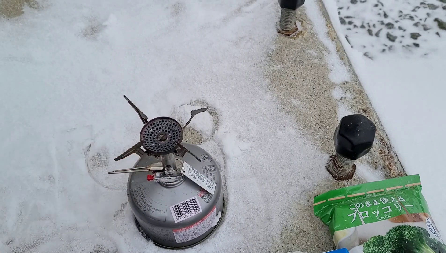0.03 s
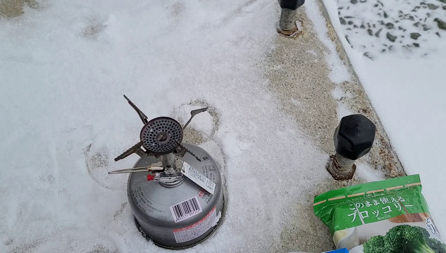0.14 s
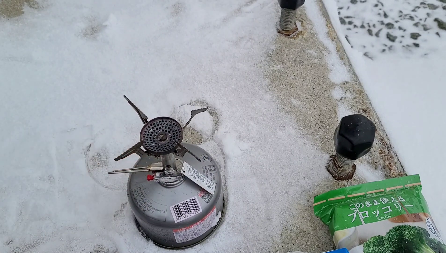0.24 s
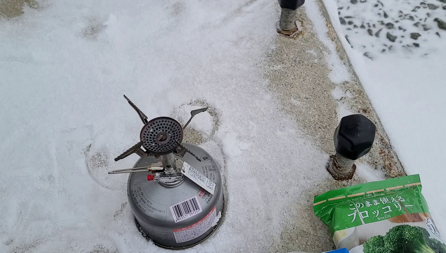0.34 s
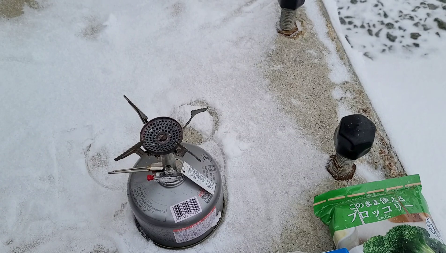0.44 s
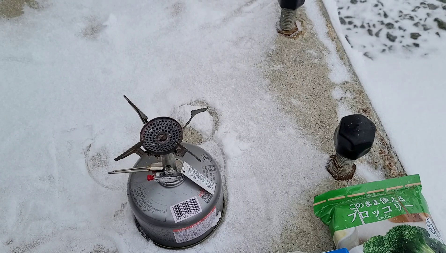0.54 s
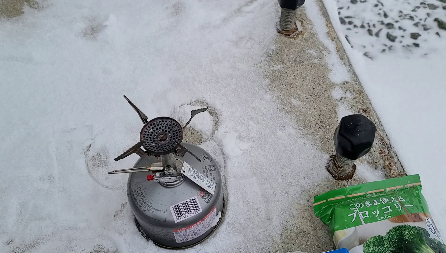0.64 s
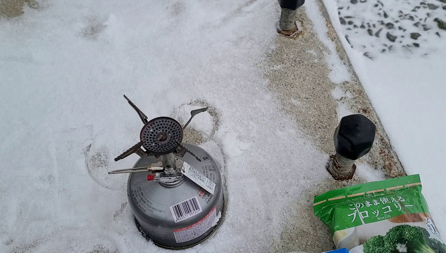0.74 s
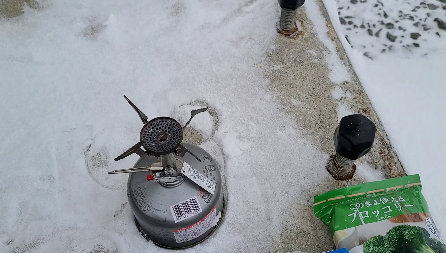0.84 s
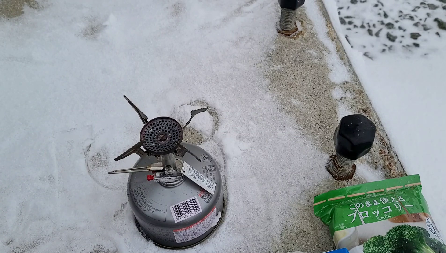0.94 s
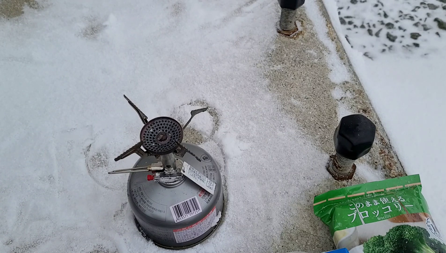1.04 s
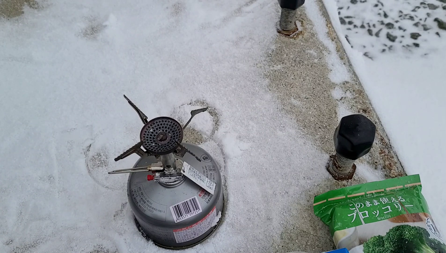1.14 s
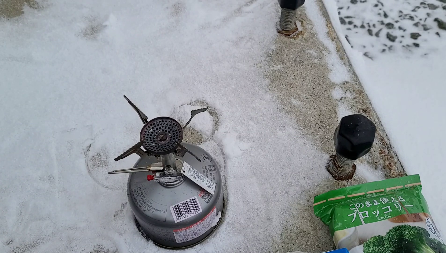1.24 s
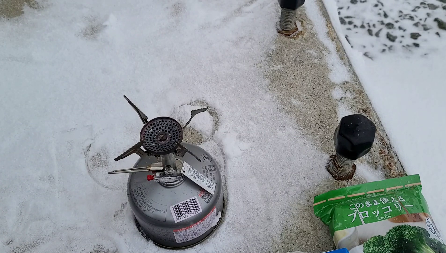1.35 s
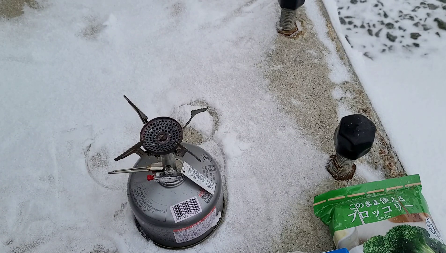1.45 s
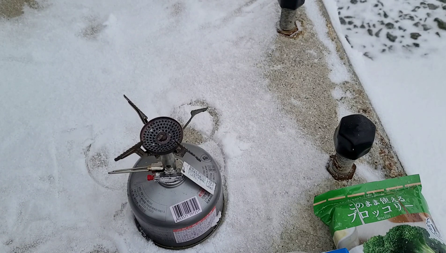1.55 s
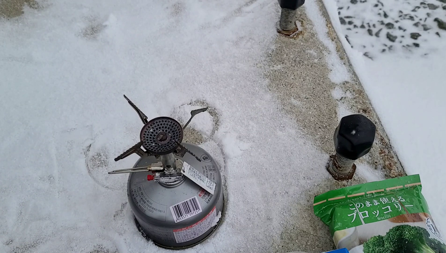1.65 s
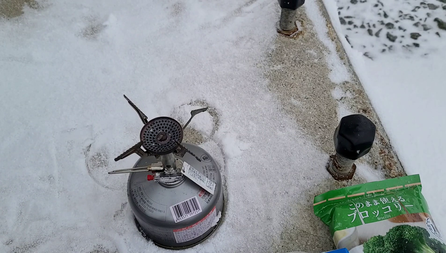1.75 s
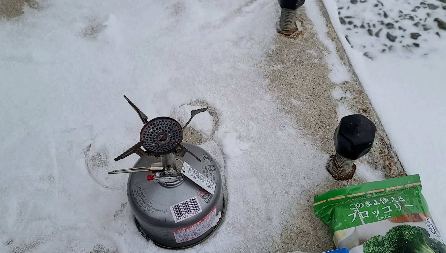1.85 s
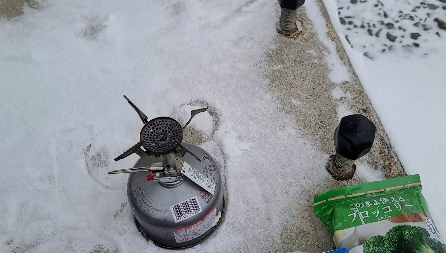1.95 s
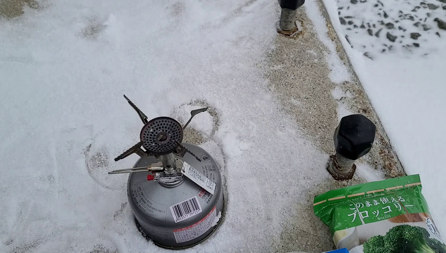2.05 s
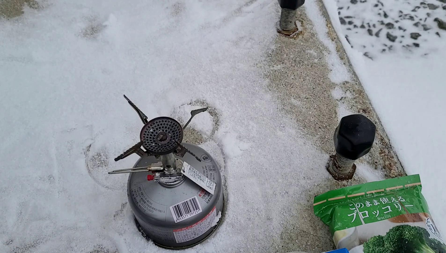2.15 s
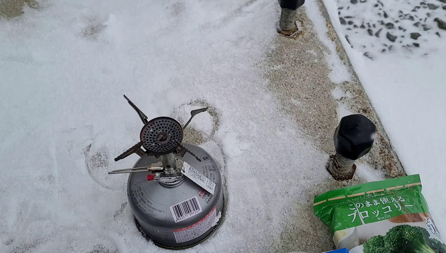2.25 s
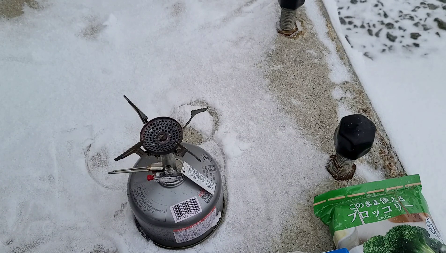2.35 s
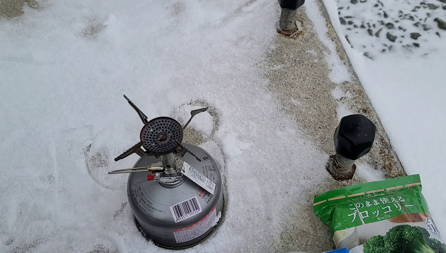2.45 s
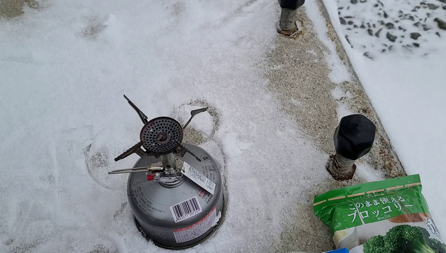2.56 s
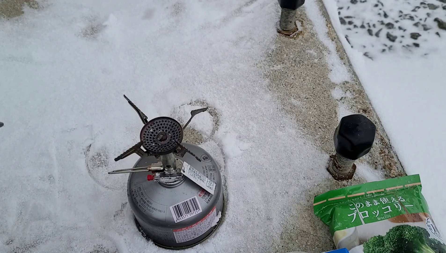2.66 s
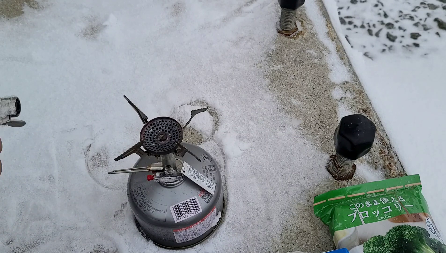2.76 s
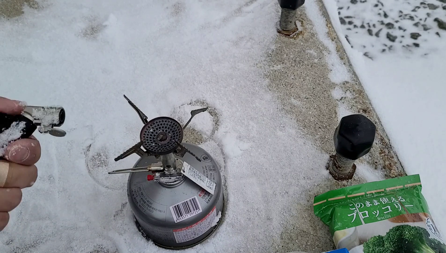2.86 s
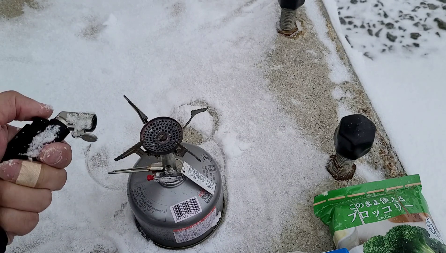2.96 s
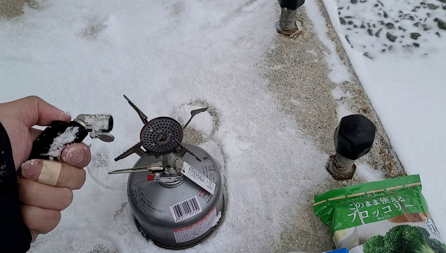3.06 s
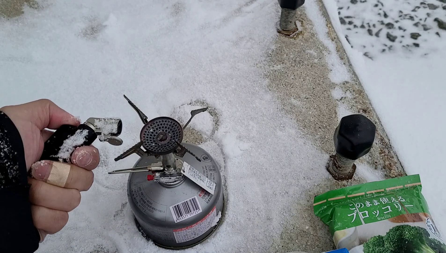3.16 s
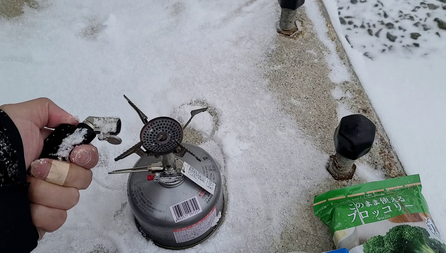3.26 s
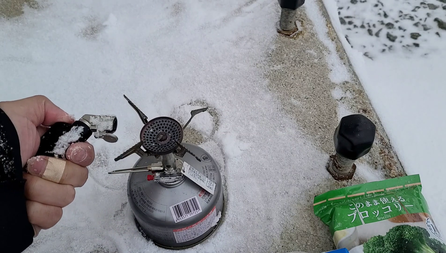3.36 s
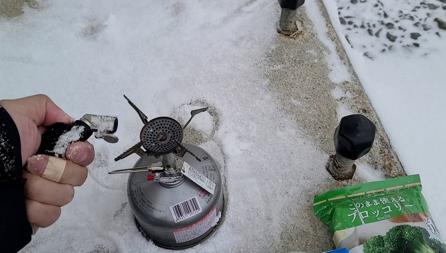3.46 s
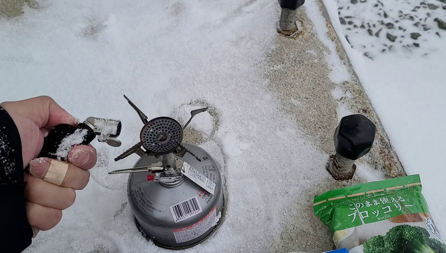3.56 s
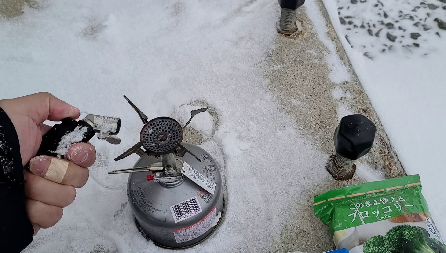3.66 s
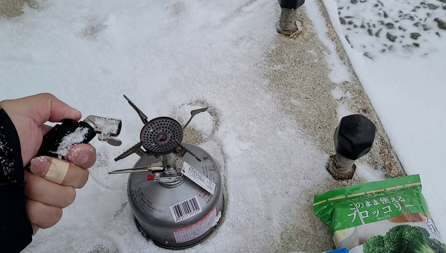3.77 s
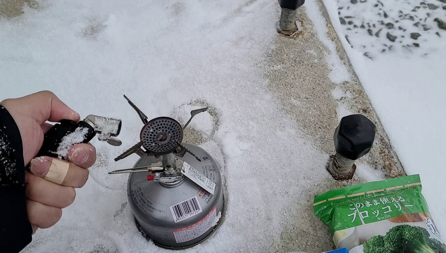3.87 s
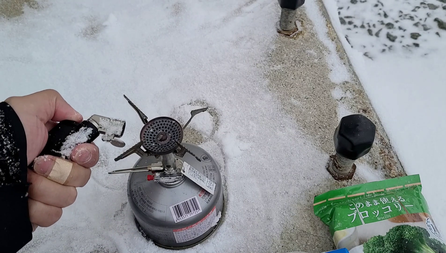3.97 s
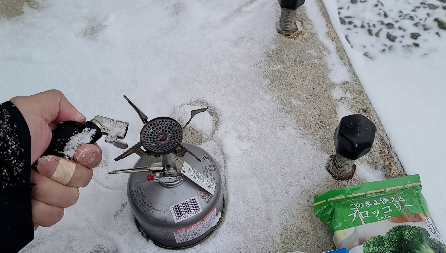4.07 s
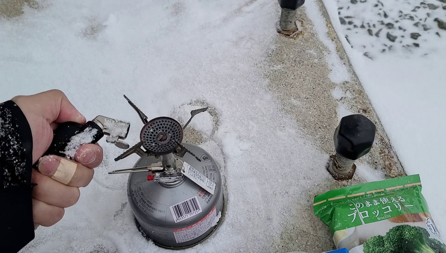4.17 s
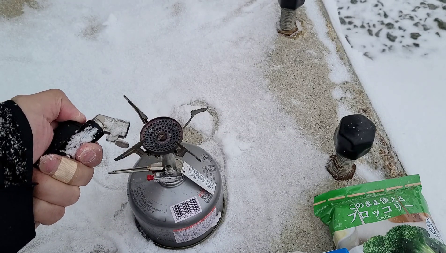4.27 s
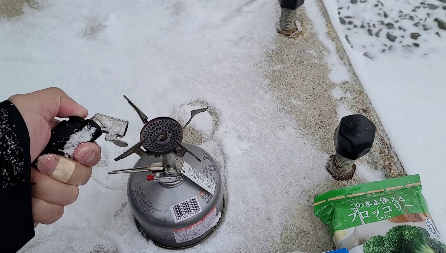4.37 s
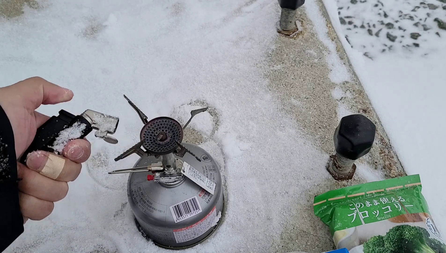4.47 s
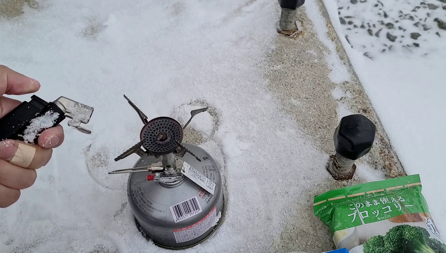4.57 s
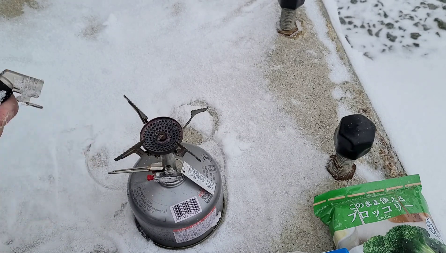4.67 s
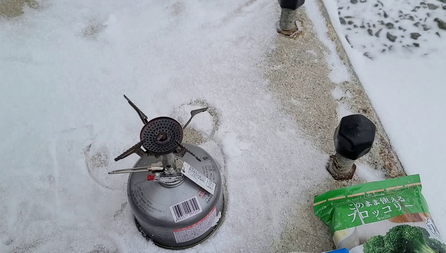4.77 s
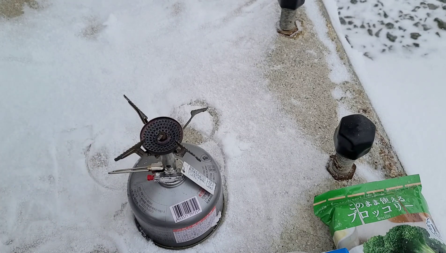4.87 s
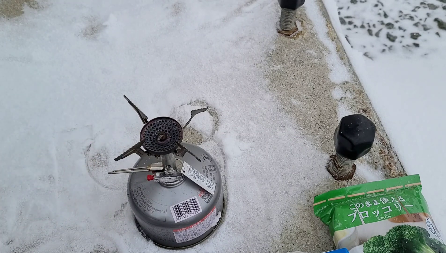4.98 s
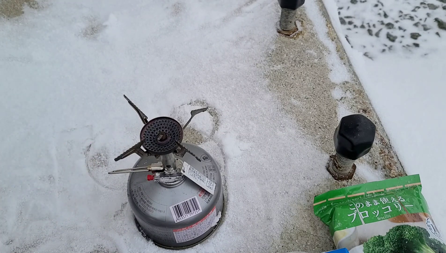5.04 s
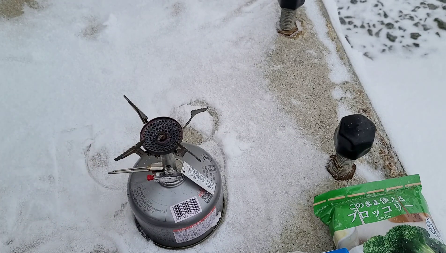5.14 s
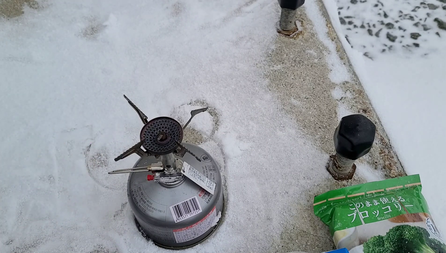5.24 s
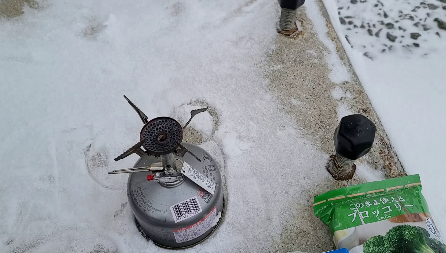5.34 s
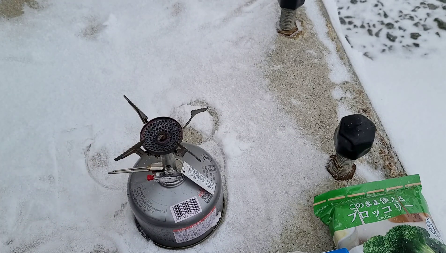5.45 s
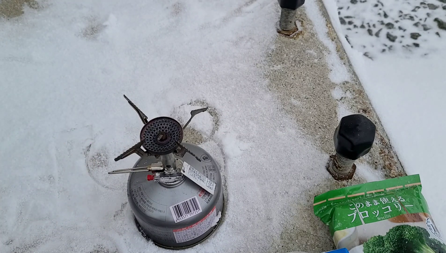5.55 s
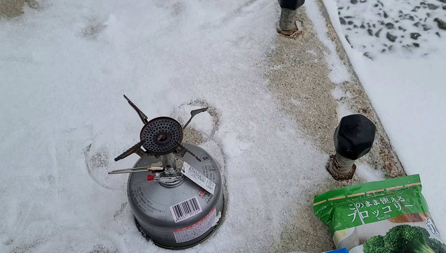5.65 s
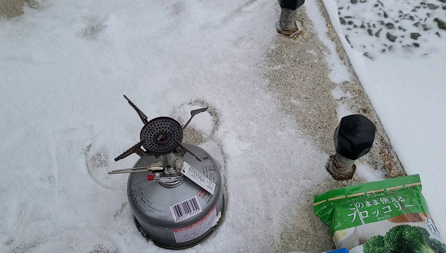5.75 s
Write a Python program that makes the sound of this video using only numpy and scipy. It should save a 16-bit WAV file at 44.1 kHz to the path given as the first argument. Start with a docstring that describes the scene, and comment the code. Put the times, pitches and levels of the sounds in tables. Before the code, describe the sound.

Outdoors on snow, very dry, with close stereo microphones. From the start a small camping stove jet gives a thin, bright hiss around 3 to 5 kHz, stronger on the left, over a very faint low outdoor rumble. In the first 0.4 s cloth rustles with sharp little crackles; then mostly hiss alone until about 1.8 s, when sleeve and hand crackles return through 2.9 s, mostly left, and the hiss softens. A few tiny ticks follow near 3.2 s. At 3.5 s a lighter snaps crisply, with small rattling rebounds and a faint release at 3.7 s. At 4.23 s it snaps again and the gas catches at once: a short, deep, loud thump. The hiss drops, and a low, puffing, fluttering flame roar with a soft rush above continues to the end at 5.8 s. Small release and handling ticks come at 4.45, 4.84 and 5.0 s, and a last lighter click at 5.3 s.

```python
"""Cold gas hisses from the jet of a small camping stove on snow, close to a pair of microphone ports, while
a hand and sleeve rustle and crackle on the left. A spring lighter snaps; at its second press the gas cloud
catches with a thump and the flame roars low, over a faint outdoor rumble. Hiss, flame, cloth and rumble are
shaped noise with wandering levels; the thump is a sagging swing; lighter and crackles are struck resonances."""
import sys
import numpy as np
from scipy import signal
from scipy.fft import rfft, irfft, next_fast_len
from scipy.io import wavfile
from scipy.ndimage import uniform_filter1d

SR = 44100
rng = np.random.default_rng(int(sys.argv[2]) if len(sys.argv) > 2 else 0)


def waveform_to_disk(signal):
    """Save audio, clipped to [-1, 1], as 16-bit WAV at the path in sys.argv[1]."""
    frames = np.transpose(np.atleast_2d(signal))
    scaled = np.clip(frames, -1, 1) * 32767
    samples = np.round(scaled).astype(np.int16)
    wavfile.write(sys.argv[1], SR, samples)


def voltage_ratio(level):
    """Linear amplitude factor for a level in decibels (scalar or array-like)."""
    return 10 ** (np.asarray(level, float) / 20)


N = 256220
TIME = np.arange(N) / SR
HZ = np.fft.rfftfreq(next_fast_len(N, True), 1 / SR) + 1  # 1 Hz up, clear of zero


def curve(rows):
    """Columns of a table of curves, one value a sample."""
    s, *columns = np.transpose(rows)
    return [np.interp(TIME, s, column) for column in columns]


def across(rows, hz):
    """Value of a (Hz, value) table on a log-frequency axis."""
    at, value = np.transpose(rows)
    return np.interp(np.log(hz), np.log(at), value)


def unit(x):
    """Scale to rms 1."""
    return x / np.sqrt(np.mean(x ** 2))


def walk(rate):
    """Random levels held 1 / rate s and slewed twice; spread 1."""
    k = int(SR / rate)
    steps = np.repeat(rng.standard_normal(3000)[:N // k + 1], k)
    return unit(uniform_filter1d(uniform_filter1d(steps, k), k)[:N])


def pair(gain, like, lag_s=0.):
    """Left and right noise of one colour; the shared part reaches the right port later."""
    real, imag = rng.standard_normal((2, 3, len(HZ)), dtype=np.float32)
    shared, left, right = real + 1j * imag
    like = np.clip(like, 0, 1)
    late = np.exp(-2j * np.pi * HZ * lag_s)
    common = np.sqrt(like) * shared * np.array([late ** 0, late])
    own = np.sqrt(1 - like) * np.array([left, right])
    return irfft(gain * (common + own))[:, :N]


def octaves(colour, like, count, low_hz):
    """Noise of a colour, cut into overlapping octave bands: (centre Hz, stereo band)."""
    gain = voltage_ratio(across(colour, HZ)) * (HZ < colour[-1][0])
    for hz in low_hz * 2. ** np.arange(count):
        window = np.cos(np.pi / 2 * np.clip(np.log2(HZ / hz), -1, 1))
        yield hz, pair(gain * window, across(like, HZ))


def add(out, s, sound, pan_db, late_s):
    """A short sound (one row, or a row for each port) laid in, the right port later."""
    rows = np.atleast_2d(sound)
    for side in range(2):
        i = int(s * SR) + side * round(late_s * SR)
        row = rows[-side]
        out[side, i:i + len(row)] += row[:N - i] * voltage_ratio(pan_db * (.5 - side))


def jet():
    """Turbulent gas rings the burner tube; every resonance flickers a little on its own."""
    # hiss level, dropping in steps, and muffled once the flame sits on it:
    # t/s, hiss level/dB, fizz above 5 kHz against the hiss/dB
    hiss_levels = [(0.0, -49, -2), (.47, -50.5, -4.5), (1.52, -49.5, -4), (2.02, -53.5, -3), (3.0, -55, -3),
                   (4.27, -56.5, -2), (4.33, -61.5, -1.5), (4.6, -60.5, -2.5), (5.0, -60, -4),
                   (5.81, -61.5, -3)]
    # resonances of the jet and burner tube:
    # f/Hz, width/Hz, relative level/dB, left minus right/dB, likeness of the ports/0-1
    burner = [(2300, 2300, -13.5, 0, 0.53), (3403, 700, -0.5, 3.5, 0.95), (4010, 680, 1, 7.5, 0.72),
              (4462, 504, 2.5, 7, 0.72), (5550, 290, -19, 4, 0.8), (6374, 600, -7.5, 5.5, 0.43),
              (7260, 740, -5.5, 4.5, 0), (8740, 2700, -15.5, -2, 0.05), (11630, 2140, -13.5, 9, 0.85),
              (14500, 1800, -14.5, 5.5, .4)]
    tube, fizz = 0, 0
    sway = walk(3.03)
    for hz, width, db, pan_db, like in burner:
        ring = 1 / (1 + ((HZ - hz) / (width / 2)) ** 2)  # a resonance passed twice: dark valleys
        sides_db = np.array([[pan_db], [-pan_db]]) / 2
        flicker_db = .5 * sway + 1.42 * walk(14.)
        band = voltage_ratio(db + flicker_db + sides_db) * pair(ring, like, lag_s=.00002)
        if hz < 5000:
            tube = tube + band
        else:
            fizz = fizz + band
    hiss_db, fizz_db = curve(hiss_levels)
    return (unit(tube) + unit(fizz) * voltage_ratio(fizz_db)) * voltage_ratio(hiss_db)


def flame():
    """Unsteady burning: a low roar puffs and flickers band by band, a rush above it flutters faster and wider."""
    # colour of the flame: f/Hz, relative level/dB per Hz
    roar_colour = [(24, -45), (40, -38), (65, -8.5), (100, 3.5), (150, -1.5), (190, 2.5), (437, -13),
                   (550, -24.5), (1100, -21), (1470, -38), (1850, -29), (3000, -50.5), (3550, -74),
                   (4470, -43.5), (6000, -45.5), (7800, -81), (13200, -120)]
    # f/Hz, likeness of the ports/0-1
    roar_like = [(100, 0.99), (300, 0.99), (640, 0.98), (1400, 0.76), (4000, 0.8)]
    # strength of the burning: t/s, low roar level/dB before the flare, rush level/dB
    burning_levels = [(4.3, -44, -45.5), (4.38, -43, -49), (4.44, -39, -42.5), (4.5, -42, -50),
                      (4.63, -45.5, -52), (4.72, -42.5, -52.5), (4.87, -39.5, -51), (4.95, -40.5, -54.5),
                      (5.06, -42.5, -50.5), (5.16, -38.5, -48), (5.26, -39.5, -53), (5.37, -42.5, -50.5),
                      (5.55, -39.5, -52), (5.7, -42, -51.5), (5.81, -43.5, -50.5)]
    catch_s, catch_rise_s = 4.252, 0.012
    flare_s, flare_db = 0.065, 8  # it catches with a brief low flare
    roar, rush = 0, 0
    puffs = walk(22.003)
    for hz, band in octaves(roar_colour, roar_like, count=8, low_hz=45.4):
        if hz < 500:
            roar = roar + band * voltage_ratio(0.83 * puffs + 1.2 * walk(25.) + 1.55 * walk(7.))
        else:
            rush = rush + band * voltage_ratio(1.5 * puffs + 2.2 * walk(40.))
    since = np.maximum(TIME - catch_s, 0)
    roar_db, rush_db = curve(burning_levels)
    flaring_db = flare_db * np.exp(-since / flare_s)
    burning = unit(roar) * voltage_ratio(roar_db + flaring_db) + unit(rush) * voltage_ratio(rush_db)
    return burning * voltage_ratio(np.array([[.6], [-.6]])) * np.minimum(since / catch_rise_s, 1)


def thump():
    """The gas cloud catches: a quick draw of air, one crest, a slower swing back, with a rough edge."""
    # one row: t of the crest/s, f at the crest on its early side/Hz and late side/Hz, rise/s, fall/s,
    # then the time from the crest in which the mean pitch halves, early/s and late/s
    ignition = (4.2827, 139, 69, .0082, .0078, .0125, .05)
    thump_db, edge_db = -9, -27  # the edge is set against the body
    lag_s = 0.00017  # the right port hears the thump later
    s, early_hz, late_hz, rise, fall, early_sag, late_sag = ignition
    t = TIME - s - lag_s * np.array([[-.5], [.5]])
    pitch_hz = np.where(t < 0, early_hz, late_hz)
    sag = np.where(t < 0, early_sag, late_sag)
    swing = np.cos(2 * np.pi * pitch_hz * t / (1 + np.abs(t) / sag))
    body = swing * np.exp(-np.where(t < 0, (t / rise) ** 2, t / fall))
    edge_colour = 1 / (1 + ((HZ - 930) / 330) ** 2) ** 2 + 0.16 / (1 + ((HZ - 2200) / 900) ** 2)
    edge = unit(pair(edge_colour, 0.98)) * np.exp(-((t + 0.0021) / 0.0049) ** 2)
    return voltage_ratio(thump_db) * (body * voltage_ratio(np.array([[.4], [-.4]])) + voltage_ratio(edge_db) * edge)


def blows():
    """The hammer chatters, a loose part rebounds in pairs of knocks; a faint swell leads up to each snap."""
    swell_gap_s, swell_db, swell_grows_db = .0008, -20.5, 1.66
    chatter_gap_s, chatter_db = 0.000885, -14  # per further blow
    rebound_s, rebound_gap_s, knocks_apart_s = .0105, .0215, .003
    rebound_db, rebound_fades_db = -24.5, 7.5
    rebound_tilt_db = -2.5  # per octave and rebound: each lands softer
    before, chatter, knock = np.arange(22, 0, -1), np.arange(3), np.arange(6)
    uneven = rng.random(len(before)) / 2
    rebound = knock // 2
    # rows: s from the snap, dB, tilt dB per octave
    swell = [-swell_gap_s * (before - uneven), swell_db - swell_grows_db * (before - 1), 0 * before]
    strikes = [chatter_gap_s * chatter, chatter_db * chatter, 0 * chatter]
    knocks = [rebound_s + rebound_gap_s * rebound + knocks_apart_s * (knock % 2),
              rebound_db - rebound_fades_db * rebound, rebound_tilt_db * (rebound + 1)]
    return np.concatenate([np.transpose(swell), np.transpose(strikes), np.transpose(knocks)])


def lighter():
    """A spring hammer chatters into the short rings of the body; every blow strikes them a little differently."""
    # a press and its softer release in turn:
    # t/s, level over a tenth of a second/dB, right port late/ms, tilt/dB per octave
    snaps = [(3.483, -28.5, 0.115, 0.9), (3.691, -51.5, .11, 0), (4.2329, -28, .1, 0.5),
             (4.4537, -50, .04, 3), (5.2862, -29.5, .46, 1)]
    # rings of the body; each of three grips of the hand lets other rings reach each port:
    # f/Hz, width/Hz, then relative level left/dB and right/dB for the first, second and third grip
    body_rings = [(260, 270, -6, -7, 15, 8.5, 3.4, 0), (600, 630, -3, 1, 8.8, -3, 9.7, -13),
                  (1250, 430, 8, 12.5, 2.4, 8, 13.6, 3), (1964, 390, 9, 6.5, 19.5, 10, 8.9, 10),
                  (2280, 230, 2, 10, 9, 7, 7, 16.5), (2590, 390, 6, 5, 13.7, 9, 1, 9),
                  (3270, 530, 13, 14, 7.8, 9.5, 13, 14.5), (4680, 800, 10.5, 2, 12.8, 7, 7.2, -11),
                  (5910, 670, 18.5, 16, 11, 15, 13, 10), (6720, 550, 13, 8, 11, 13, 12, 1),
                  (7740, 1040, 1, 11.5, 7, 7, 2.2, 2), (8660, 910, 1, 8, 6, 9.5, 2.6, -5),
                  (9880, 1200, 10, 1, 8.1, -2, 5.3, -8), (11000, 870, 4, 0, 12.5, 8, 14, 1),
                  (12840, 1400, 12, 5, 11, 0, 9.2, 6), (14800, 1000, 12, 5, 3, 8, 11.4, 2)]
    rattle_s, rattle_db = 0.0048, -30.5  # each blow leaves a short rattle
    rings_within_s = .0012
    out, hits = np.zeros((2, N)), blows()
    first_s = hits[0][0]
    hz = np.fft.rfftfreq(4096, 1 / SR) + 1
    octave = np.log2(hz / 3000)
    f, width, *grips = np.transpose(body_rings)
    detune = hz / f[:, None] - f[:, None] / hz
    rings = 1 / (1 + 1j * detune * (f / width)[:, None]) ** 2  # steep: dark valleys
    chance = rng.random((len(snaps), len(hits), 3, len(body_rings)))
    fading = voltage_ratio(rattle_db) * np.exp(-np.arange(4096) / SR / rattle_s)
    for k, ((s, db, late_ms, tilt_db), draws) in enumerate(zip(snaps, chance)):
        grip_db = np.reshape(grips, (-1, 2, len(f)))[k // 2]  # a press and its release share a grip
        snap = np.zeros((2, len(hz)), complex)
        for (after, blow_db, soft_db), (lag, turn, skew) in zip(hits, draws):
            phase = 2 * np.pi * turn + 0.71 * (skew - .5) * np.array([[1], [-1]])
            # the blow reaches each part at its own moment
            reached = np.exp(-2j * np.pi * hz * rings_within_s * lag[:, None])
            body = (voltage_ratio(grip_db) * np.exp(1j * phase)) @ (rings * reached)
            body = body * (1 + rfft(fading * rng.standard_normal((2, len(fading)))))
            delay = np.exp(-2j * np.pi * hz * (after - first_s))
            snap += voltage_ratio(blow_db + (tilt_db + soft_db) * octave) * delay * body
        snap = irfft(snap * (hz / (hz - 180j)) ** 2)  # a small object sends out no bass
        add(out, s + first_s, voltage_ratio(db) * unit(snap), 0, late_ms / 1000)
    return out


def faint(count):
    """Fainter crackles, rows like the crackle table's, that fall at random while the hand moves."""
    from_s, to_s, mid_db, mid_hz = 1.8, 2.7, -48, 800
    when, size, pitch, pan = rng.random((count, 4)).T
    return np.transpose([from_s + (to_s - from_s) * when, mid_db + 6 * (size - .5),
                         mid_hz * 2 ** (1.4 * (pitch - .5)), 7 * pan, np.full(count, -19.)])


def crackles():
    """Each crackle or knock is a blow and a smaller slip through one broad resonance, with a crisp edge."""
    # crackles of sleeve, hand and snow, and three knocks of the lighter just after its first snap,
    # each laid in 0.92 ms after its t:
    # t/s, peak level before panning/dB, f/Hz, left minus right/dB, crisp edge against the knock/dB
    crackle_rows = [(0.02, -38.5, 348, 1, -29), (0.055, -20, 2140, 6.5, -2), (0.089, -26, 2580, 5, -22),
                    (0.138, -31, 2700, 8, -12), (0.224, -42, 2000, 6, -15), (0.249, -40.5, 1140, 16, -23),
                    (0.28, -38, 690, 4, -29), (0.289, -26.5, 2940, 7, -16), (0.348, -38, 1500, 7, -4),
                    (0.366, -37, 880, 2, -31), (0.693, -45, 540, 4, -23.5), (1.555, -46, 1000, 4, -19.5),
                    (1.813, -30.5, 497, 1, -13), (1.82, -34.5, 1250, 5, -14), (1.953, -22, 2870, 11, -1),
                    (1.999, -31, 2920, 15, 13), (2.055, -30.5, 1230, .5, -11.5),
                    (2.188, -40.5, 1160, 10, -17.5), (2.378, -41, 810, 14, -17), (2.408, -41, 650, 6, -24),
                    (2.472, -42.5, 800, 7, -27), (2.494, -43, 895, 7, -17), (2.529, -41, 859, -1, -17),
                    (2.577, -37, 1800, 4, -12), (2.719, -39.5, 850, 1, -25), (2.744, -40.5, 778, -1, -21.5),
                    (2.78, -37.5, 1690, 7, -25), (2.847, -33.5, 2900, 9, -12), (2.849, -42, 1250, 6, -22),
                    (3.159, -42.5, 1350, 10, -25), (3.168, -37, 2100, 10, -8), (3.175, -40.5, 705, 4, -16),
                    (3.335, -38, 600, 4, -11), (3.494, -28, 1800, 1, -25), (3.5135, -32, 1880, 1, -27),
                    (3.5175, -42, 1800, 3, -25), (4.067, -43.5, 487, 2.5, -19),
                    (4.8369, -31.5, 2440, 5.5, -22), (4.838, -36.5, 1370, 11, -25),
                    (4.995, -35, 1840, 11, -9)]
    scuff_s, scuff_db = 0.019, -33.5  # a scuff drags on briefly after each
    out = np.zeros((2, N))
    hz = np.fft.rfftfreq(1024, 1 / SR) + 1
    fading = voltage_ratio(scuff_db) * np.exp(-np.arange(1024) / SR / scuff_s)
    rows = np.concatenate([crackle_rows, faint(count=7)])
    chance = rng.random((len(rows), 3))
    for (s, db, pitch_hz, pan_db, edge_db), (slip, turn, late) in zip(rows, chance):
        knock = 1 / (1 + 0.95j * (hz / pitch_hz - pitch_hz / hz)) ** 2
        edge = voltage_ratio(edge_db) / (1 + .7j * (hz / 6000 - 6000 / hz))
        slip_s = 0.00055 + 0.00086 * slip
        blow_and_slip = np.sign(turn - .5) * (1 - 0.4 * np.exp(-2j * np.pi * hz * slip_s))
        scuff = 1 + rfft(fading * rng.standard_normal(len(fading)))
        crack = irfft(blow_and_slip * scuff * (knock + edge))
        add(out, s + 0.00092, voltage_ratio(db) * crack / np.abs(crack).max(), pan_db, 0.000094 * late)
    return out


def sleeve():
    """Cloth rubbing: noise broken into grains of uneven size, in strokes that swell, hold and die away."""
    # strokes: start t/s, length/s, rustle level/dB
    stroke_rows = [(-.1, 0.33, -49.5), (1.724, 1.3, -60.5)]
    # colour of the cloth: f/Hz, relative level/dB per Hz
    cloth_colour = [(250, 10), (500, 7.5), (1000, 2.5), (2000, 3), (4000, -1), (8000, -2.5), (15000, -68)]
    attack_s, release_s = 0.042, 0.23
    grains = voltage_ratio(3.0 * walk(300.) + 1.5 * walk(25.))
    cloth = pair(voltage_ratio(across(cloth_colour, HZ)) * HZ / (HZ + 200), 0.35, lag_s=.0001)
    strokes = 0
    for s, length, db in stroke_rows:
        swell = np.clip((TIME - s) / attack_s, 0, 1)
        die_away = np.exp(-np.maximum(TIME - s - length, 0) / release_s)
        strokes = strokes + voltage_ratio(db) * swell * die_away
    return unit(cloth * grains) * strokes * voltage_ratio(np.array([[2.2], [-2.2]]))


def air():
    """Distant rumble in slow lumps and a thin outdoor wash above it."""
    # colour of the open air: f/Hz, relative level/dB per Hz
    air_colour = [(15, -33), (25, -12.5), (66, 2.5), (102, -9.5), (175, -14), (243, -21), (386, -19),
                  (728, -24.5), (991, -31), (1130, -27), (1320, -30), (2500, -29.5), (3250, -28),
                  (5500, -120)]
    # f/Hz, likeness of the ports/0-1
    air_like = [(60, 0.86), (130, 0.97), (290, 0.89), (640, 0.34), (1400, 0.21)]
    # rumble before its random lumps: t/s, level/dB
    rumble_levels = [(0, -53), (.15, -52.5), (.45, -56.5), (.8, -53), (1.55, -51.5), (1.85, -56.5),
                     (2.0, -47.5), (2.3, -53.5), (2.44, -53), (2.6, -55.5), (3.3, -55), (3.67, -53.5),
                     (3.8, -56), (3.93, -49), (4.0, -57), (4.3, -53), (5.81, -53)]
    wash_db, lump_db = -58.5, 0.5
    rumble, wash = 0, 0
    for hz, band in octaves(air_colour, air_like, count=8, low_hz=25.8):
        if hz < 150:
            rumble = rumble + band * voltage_ratio(0.64 * walk(13.0))
        else:
            wash = wash + band * voltage_ratio(0.47 * walk(8.3))
    lumps = voltage_ratio(curve(rumble_levels)[0] + lump_db * walk(4.67))
    return (unit(rumble) * lumps + unit(wash) * voltage_ratio(wash_db)) * voltage_ratio(np.array([[.6], [-.6]]))


def scene():
    """All sources, outdoors: snow soaks up the echoes."""
    return jet() + flame() + thump() + lighter() + crackles() + sleeve() + air()


def band_limit(x):
    """A steep low-pass at the top of the band."""
    return signal.sosfilt(signal.butter(12, 16650, fs=SR, output="sos"), x)


def record(dry):
    """The microphones roll off steeply at the very top."""
    top_hz = 15600
    dull = signal.sosfilt(signal.butter(12, top_hz, fs=SR, output="sos"), dry)
    return band_limit(dull)


dry = scene()
out = record(dry)
waveform_to_disk(out)
```